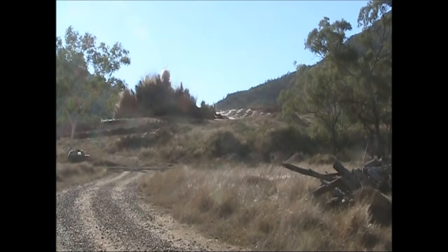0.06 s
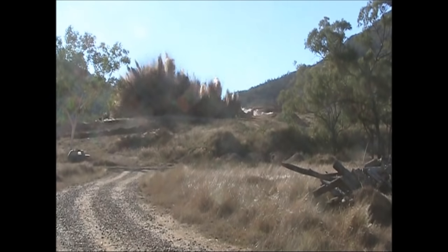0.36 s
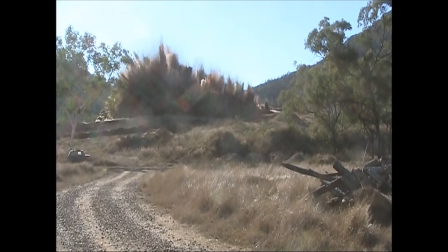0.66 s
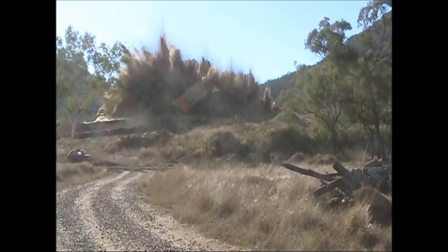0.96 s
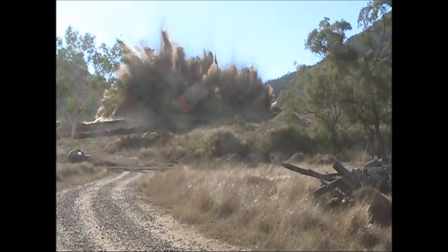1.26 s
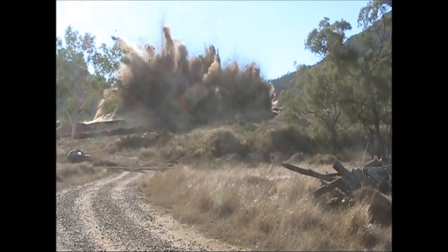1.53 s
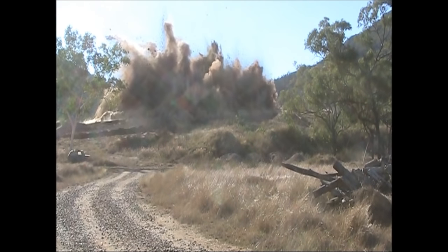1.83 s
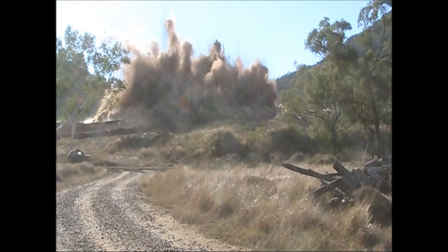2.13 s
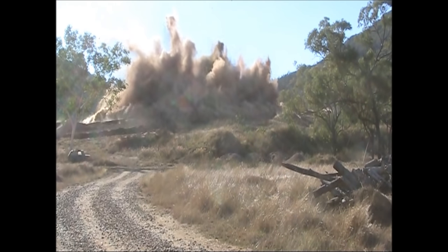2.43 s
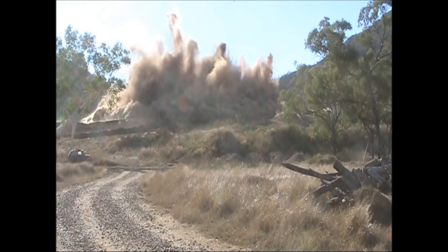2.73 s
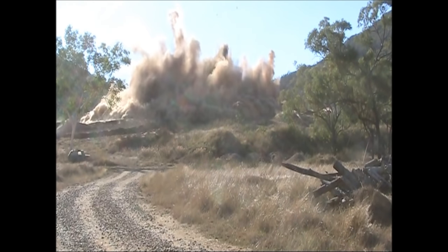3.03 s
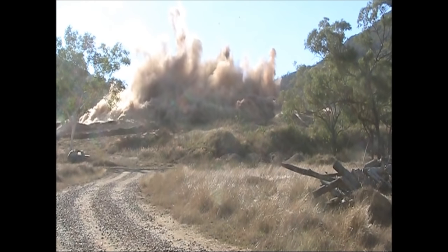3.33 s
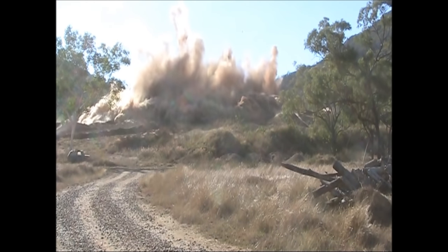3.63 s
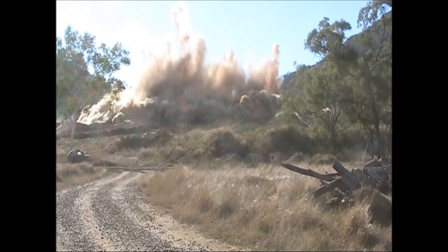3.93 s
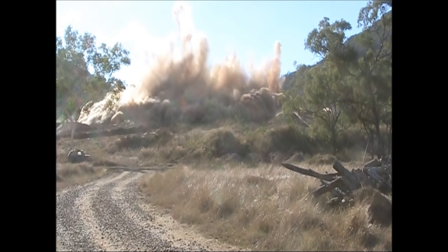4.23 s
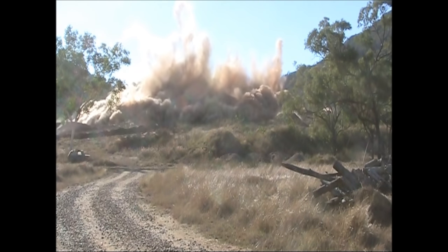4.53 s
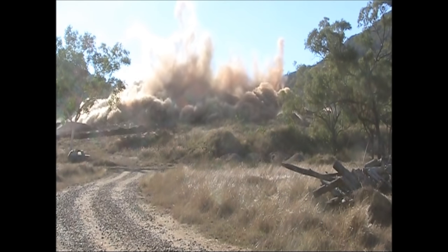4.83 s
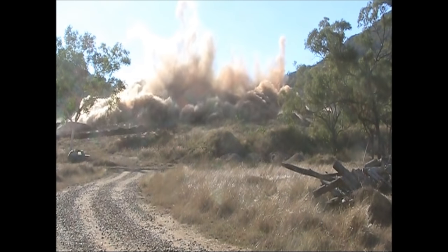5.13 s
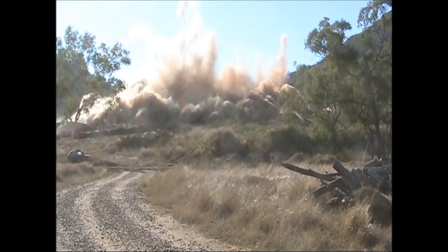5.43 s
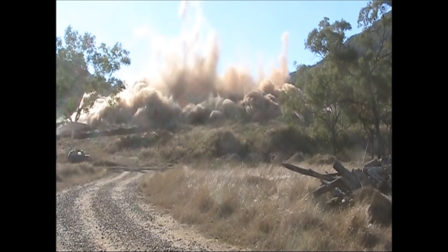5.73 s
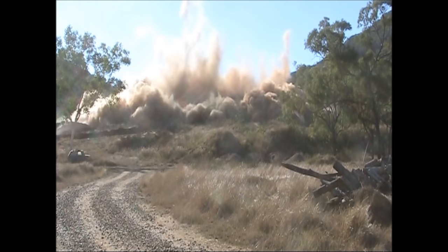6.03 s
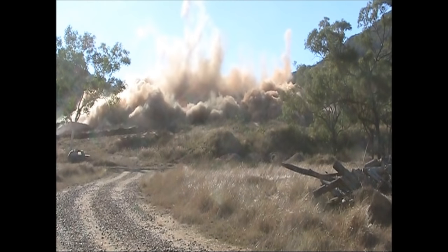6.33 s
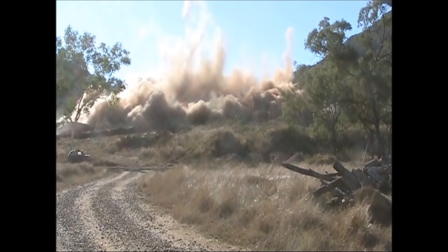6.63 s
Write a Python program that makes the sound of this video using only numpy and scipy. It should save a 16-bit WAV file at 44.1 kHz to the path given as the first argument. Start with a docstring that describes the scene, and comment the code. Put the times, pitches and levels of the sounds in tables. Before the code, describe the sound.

Detonators crackle along a distant quarry face as a ragged train of deep, heavy booms overloads the microphone. Dull thuds echo off the hills. Flung grit then rains down in a rushing roar, boulders tumble and loose rubble slides. Single stones and small chips clack ever more faintly as everything settles, heard outdoors in stereo over a faint low rumble and hiss.

```python
"""A quarry blast, taken outdoors from afar on a faintly hissing stereo microphone.
Detonators crackle away along the rock face, and the charges fire in a ragged train of deep air shocks
that overload the microphone. One tiny tick sounds close by. The boom rolls off the hills in dull thuds
while flung grit rains back in a rushing roar. Boulders tumble, the loose pile slides,
and single stones and chips clack on the quarry floor as it all settles over a faint low rumble."""
import sys
import numpy as np
from scipy import signal
from scipy.fft import rfft, irfft, next_fast_len
from scipy.io import wavfile
from scipy.ndimage import map_coordinates

SR = 44100
rng = np.random.default_rng(int(sys.argv[2]) if len(sys.argv) > 2 else 0)


def persist_wave(psi):
    """Save psi, clipped to +-1, as 16-bit WAV."""
    counts = np.round(np.clip(psi, -1, 1) * 32767).astype(np.int16)
    wavfile.write(sys.argv[1], SR, np.atleast_2d(counts).T)


N = 302967

# Single events; levels are relative within each table.
CRACKS = [(.001, -4), (.0222, -3.5), (.0436, -5.5), (.0645, -4.5), (.0703, -6.5), (.087, -1), (.1053, -9),
          (.1112, -10), (.1184, -6), (.1292, -10.5), (.1533, -3.5), (.179, -11), (.199, -9), (.2423, -14.5),
          (.2645, -7), (.2884, -16), (.3088, -15.5), (.3277, -8), (.337, -9), (.3507, -14.5), (.378, -13.5),
          (.3894, -11), (.4113, -13.5), (.4315, -12.5), (.4372, -12), (.4466, -13), (.475, -13),
          (.5048, -13), (.5345, -11.5), (.543, -14), (.5647, -14.5), (.5803, -11), (.593, -14.5),
          (.6168, -11.5), (.6268, -10.5), (.6378, -14.5), (.6507, -17), (.6585, -8), (.6834, -9),
          (.701, -14.5), (.7273, -11.5), (.7524, -12.5), (.766, -15), (.7933, -18), (.8203, -17),
          (.8322, -16.5), (.871, -18), (.9268, -18.5), (.957, -22), (.977, -22), (.9932, -19.5)]  # sharpest detonators: t/s, level/dB
CHARGES = [(.11, -4, 6.5), (.121, -8.5, 4.3), (.135, 3, 5.1), (0.164, -10, 6.9), (.172, 0.5, 5.8),
           (.182, 4.5, 5), (.204, -6, 5.2), (0.229, -1, 4), (0.256, -10, 6.9), (.267, -10.5, 2.8),
           (.274, -9, 7.1), (0.304, -10, 11), (.331, -7.5, 4.2), (.341, -11.5, 5), (.351, -7, 7.4),
           (.411, -10.5, 5.4), (.458, -3, 6.4), (.477, -6.5, 9.3), (0.509, -9.5, 4.6), (.568, -8.5, 3.8),
           (0.592, -6.5, 6.7), (.62, -12, 8.5), (0.644, -15.5, 5.5), (.727, -13, 11), (.745, -11, 6),
           (0.752, -16, 10), (0.811, -8, 9.3), (0.837, -7, 8), (0.876, -10.5, 7), (.939, -13, 3.5),
           (.947, -3, 5.7), (0.963, -7.5, 3.3), (1.003, -4, 6.8), (1.023, -13.5, 12), (1.038, -6.5, 7.9),
           (1.069, -11, 7.3), (1.095, -10.5, 7.4), (1.134, -9.5, 3.1), (1.176, -13.5, 9), (1.192, -3, 11.2),
           (1.251, -14, 14), (1.35, -16, 4.8)]  # air shocks of the heaviest charges: t/s, level/dB, push length/ms
TICK = (.7485, -29, 6000)  # tick beside the microphone: t/s, level/dB, f/Hz
ECHOES = [(1.438, -26.5, 79.4), (1.543, -28.5, 70), (1.632, -26, 65.4), (1.697, -31, 65),
          (1.871, -26.5, 80), (1.961, -26.5, 94), (2.108, -32, 90)]  # thuds off the far slopes: t/s, level/dB, f/Hz
ROCKS = [(1.624, -25.5, 1410, 1), (2.889, -32, 129, .5), (2.947, -26, 630, .7), (3.142, -29.5, 212, 0.37),
         (3.289, -26, 238, 0.52), (3.499, -33, 120, 0.46), (3.531, -30.5, 86, 0.54),
         (3.613, -32, 398, 0.46), (3.626, -34, 2300, 1.2), (3.66, -36, 198, .5), (3.667, -31, 1200, 0.87),
         (3.706, -33, 1080, 0.89), (3.749, -33, 900, 0.74), (3.816, -29, 373, .6), (4.013, -32, 1290, 0.89),
         (4.093, -28, 1250, 0.82), (4.2277, -36, 2080, 1.4), (4.2727, -40, 2200, 1.4),
         (4.288, -32.5, 1140, 0.84), (4.31, -40, 2800, 1.5), (4.4555, -34, 3600, 2.5),
         (4.458, -32.5, 152, .5), (4.597, -34, 905, .8), (4.861, -36.5, 2200, 1.5), (4.93, -36, 1900, .8),
         (5.065, -32.5, 1600, .7), (5.105, -34.5, 560, 0.42), (5.177, -39, 3400, 1.9),
         (5.2312, -26, 1270, 1.3), (5.3176, -38, 3000, 2.7), (5.362, -35.5, 162, .5),
         (5.378, -43.5, 169, 0.41), (5.501, -39, 160, .5), (5.57, -40, 123, 0.56), (5.605, -41, 150, .5),
         (5.626, -40, 2370, 1.6), (5.724, -37, 2900, 0.8), (5.729, -42, 274, 0.46),
         (5.757, -37.5, 1130, .9), (5.7863, -44, 2300, 1.5), (5.792, -40, 140, 0.59),
         (5.887, -46, 2400, 1.5), (6.016, -41, 405, .6), (6.017, -47, 2780, 1.9), (6.092, -43, 3520, 2.3),
         (6.251, -38.5, 2830, 3.7), (6.3364, -43.5, 2400, 1.7), (6.493, -46, 2600, 1.7),
         (6.674, -42, 145, 0.54), (6.713, -44.5, 1940, 1.4), (6.7485, -49, 2500, 1.6),
         (6.812, -40, 1020, .7)]  # loudest rocks landing, big ones low: t/s, level/dB, f/Hz, ring/cycles
CHIPS = (3.8, -45, 3.8, 2950)  # skittering chips: first t/s, first level/dB, fade/(dB/s), typical f/Hz

# Swells: rise until t/s, fade from t/s, relative level/dB, rise/(dB/s), fade/(dB/s)
NEAR_STRING = (0, 0.18, -22.5, 100, 60.5)  # detonators at the near end of the face
FAR_STRING = (0.56, 0.6746, -26.5, 11, 23)  # and at the far end
HEAVE = (.16, .18, -13, 150, 23)  # the first charges lift the face
GROUND_SURGE = (.88, 1.15, -21, 40, 28)  # the ground surges under the last rows of charges
ROLL_RETURN = (1.9, 1.98, -43, 70, 75)  # a faint roll between the echoes
LOW_FLOOR = (-1.5, 3, -59, 25, -0.3)  # a faint, steady low outdoor rumble
RUBBLE_BURST = (1.7, 1.43, -39.5, 7.5, 20)  # rubble bursts from the face
GRIT_RUSH = (2, 3, -41, 7.5, 19)  # the bulk of the grit comes down
GRIT_TRICKLE = (0.2, 3.5, -48, 17, 4)  # the highest flung keeps falling
BOULDER_FALL = (2.5, 3, -38.5, 20.5, 5)  # the heaviest blocks come down
RUBBLE_FALL = (2.5, 4, -45, 2.5, 3.5)  # rubble lands on the quarry floor
SLUMP = (3.54, 3.68, -43.5, 90, 45)  # the boulder pile gives way
SLIDE = (3.6, 3.82, -45.5, 14, 55)  # the loose pile slides

# Spectra at the microphone position: f/Hz, relative level/dB
HISS = [(30, 6), (500, -17), (3000, 6.5), (5000, 15), (7000, 12), (9000, 8.5), (12000, 4.5), (14400, -1.5),
        (15400, -12.5)]  # noise floor
NEAR_CRACKLE = [(30, -21.5), (100, -4), (200, -1.5), (450, 3), (800, 0), (1400, -0.5), (2000, -3.5),
                (3000, -12.5), (4200, -24.5), (5000, -35), (7000, -46.5), (10000, -67.5), (15000, -79)]  # near detonators
FAR_CRACKLE = [(100, -16.5), (300, -6.5), (600, -4), (900, 0), (1450, 0), (2000, -6.5), (3000, -16),
               (4200, -27.5), (5000, -42.5), (7000, -54), (10000, -74), (15000, -76)]  # far detonators
GROUND = [(12, -40.5), (25, -9.5), (42, -1), (85, -3), (125, -2.5), (200, -15), (350, -19), (600, -29),
          (1500, -65.5), (4000, -120)]  # heaving rock face
ROLL = [(12, -43), (25, -13.5), (45, 4), (70, -2.5), (110, -9), (170, -15), (300, -27.5), (1000, -78)]  # dark roll and low outdoor rumble
GRIT = [(300, -35), (800, -6), (1400, 1), (2000, -2), (2800, -6.5), (3500, -12), (4300, -17), (5000, -33.5),
        (6300, -34), (8000, -57.5), (15000, -73.5)]  # raining grit
RUBBLE = [(80, -29.5), (170, -0.5), (280, 3.5), (430, 2), (700, 1), (1100, -2.5), (1600, -30.5),
          (2500, -21), (5000, -34), (10000, -120)]  # falling rubble
BOULDERS = [(12, -34), (30, -4), (60, -3.5), (105, 0), (180, -4.5), (280, -13), (500, -15), (1000, -37),
            (3000, -120)]  # big blocks
COBBLES = [(12, -41), (30, -10), (60, -6), (110, -0.5), (170, 0), (280, -8.5), (500, -12.5), (1000, -44.5),
           (3000, -120)]  # smaller blocks
SCREE = [(120, -35.5), (300, -7), (410, 0.5), (560, -6), (750, -11.5), (1300, -34.5), (4000, -90)]  # sliding stones

LIKENESS = [(30, .995), (120, .995), (280, .96), (1000, .985), (2000, .975), (4000, .93), (8000, .8)]  # likeness of the two channels at width 1: f/Hz, correlation
BALANCE = [(60, -2.5), (150, -2), (400, -2), (1000, -3), (2000, -0.5), (4000, -1.5)]  # left minus right at lean 1: f/Hz, level/dB
HILL_DECAY = [(60, 1.3), (400, 0.39), (2000, 0.12), (8000, 0.28)]  # reverberation of the slopes: f/Hz, t60/s


def amp(db):
    """Decibels to gain."""
    return 10 ** (np.asarray(db) / 20)


def unit(x):
    """x at rms 1."""
    return x / np.sqrt(np.mean(x ** 2) + 1e-20)


def along(points, hz):
    """A table of f/Hz, value read on a log frequency axis."""
    f, v = np.transpose(points)
    return np.interp(np.log(hz + 1), np.log(f + 1), v)


def clock():
    """t/s of every sample."""
    return np.arange(N) / SR


def ramp(start, end):
    """0 before start, 1 after end."""
    return np.clip((clock() - start) / max(end - start, 1e-3), 0, 1)


def wobble(rate):
    """A smooth random curve, rate knots a second."""
    return map_coordinates(rng.standard_normal(int(N * rate / SR) + 4), [clock() * rate])


def swells(*rows):
    """Gain of one or more swells, whose powers add."""
    t, power = clock(), 0
    for from_s, until_s, db, rise, fade in rows:
        power += amp(db - rise * np.maximum(from_s - t, 0) - fade * np.maximum(t - until_s, 0)) ** 2
    return np.sqrt(power)


def blend(share, first, second):
    """Cross-fade two unrelated sounds at constant power."""
    return np.sqrt(1 - share) * first + np.sqrt(share) * second


def add(track, s, sound):
    """Mix a sound into the track at s seconds."""
    i = max(round(s * SR), 0)
    track[i:i + len(sound)] += sound[:N - i]


def filtered(x, response):
    """x times a response of frequency."""
    size = next_fast_len(N + SR // 2)
    return irfft(rfft(x, size) * response(np.fft.rfftfreq(size, 1 / SR)), size)[..., :N]


def lowpass(x, edge_hz, order):
    """x dulled above edge_hz."""
    return filtered(x, lambda hz: 1 / np.sqrt(1 + (hz / edge_hz) ** (2 * order)))


def impulse(spectrum, size=4096):
    """The sharpest causal pulse with this spectrum, peak 1."""
    cepstrum = irfft(np.log(amp(along(spectrum, np.fft.rfftfreq(size, 1 / SR)))))
    cepstrum[1:size // 2] *= 2
    cepstrum[size // 2 + 1:] = 0
    pulse = irfft(np.exp(rfft(cepstrum)))
    return pulse / np.abs(pulse).max()


def shower(spectrum, rate, spread_db, wash, width=1):
    """Stereo hail of rate uneven blows a second over a wash of countless tiny ones; rms 1."""
    sizes = amp(spread_db * np.clip(rng.standard_normal(N), -2, 2)) * rng.choice([-1, 1], N)
    blows = unit(sizes * (rng.random(N) < rate / SR))
    hail = unit(blows + wash * rng.standard_normal(N))
    diffuse = rng.standard_normal(N)
    pair = signal.fftconvolve([hail, diffuse], impulse(spectrum)[None], axes=1)[:, :N]
    angle = lambda hz: np.minimum(width * np.arccos(along(LIKENESS, hz)) / 2, np.pi / 4)
    mid, side = filtered(pair, lambda hz: np.array([np.cos(angle(hz)), np.sin(angle(hz))]))
    return unit(np.array([mid + side, mid - side]))


def knock(pitch_hz, cycles, grind):
    """A dead blow: a few cycles and a short crush of noise around them, peak 1."""
    phase = np.arange(SR // 8) / SR * pitch_hz
    band = signal.butter(2, [pitch_hz * .6, min(pitch_hz * 1.35, SR / 2 - 1)], "band", fs=SR)
    crush = unit(signal.lfilter(*band, rng.standard_normal(len(phase))))
    ring = np.sin(2 * np.pi * phase) * np.exp(-phase / cycles)
    attack = 1 - np.exp(-(phase / .5) ** 2)
    blow = attack * (ring + grind * crush * np.exp(-phase / (2.5 * cycles)))
    return blow / np.abs(blow).max()


def hills(x):
    """Stereo scatter from the slopes and trees around, the bass lasting longest."""
    hz, t, noise = signal.stft(rng.standard_normal((2, SR)), SR, nperseg=256)
    tail = signal.istft(noise * amp(-60 * t / along(HILL_DECAY, hz)[:, None]), SR, nperseg=256)[1]
    return signal.fftconvolve(x[None], tail / np.linalg.norm(tail[0]), axes=1)[:, :N]


def placed(x, lead_ms, lean):
    """x reaches the left capsule a little early and the right one louder."""
    early = lambda hz: np.exp(1j * np.pi * np.outer([1, -1], hz) * lead_ms / 1000)
    return filtered(x, lambda hz: early(hz) * amp(np.outer([.5, -.5], lean * along(BALANCE, hz))))


def hiss(level_db=-69):
    """Faint steady hiss, unrelated in the two channels."""
    return amp(level_db) * unit(filtered(rng.standard_normal((2, N)), lambda hz: amp(along(HISS, hz))))


def volley(crackle_db=-3, crack_db=3, echo_db=-12, scatter=0.058):
    """Detonators snap in a dense string that runs away from the microphone and loses its body."""
    far = ramp(0.14, 0.63)
    crackle = blend(far, shower(NEAR_CRACKLE, rate=650, spread_db=3.5, wash=0.69),
                    shower(FAR_CRACKLE, rate=450, spread_db=1.0, wash=0.98, width=1.7))
    crackle *= amp(crackle_db) * swells(NEAR_STRING, FAR_STRING)
    snaps, t = np.zeros(N), np.arange(SR // 100) / SR
    for s, db in CRACKS:
        # rough ground breaks up each snap
        broken = scatter * rng.standard_normal(len(t)) * amp(-60 * t / 0.028)
        add(snaps, s, amp(db + crack_db) * ((t == 0) * 0.5 + broken))
    cracks = signal.fftconvolve(snaps * (1 - far), impulse(NEAR_CRACKLE))[:N]
    cracks += signal.fftconvolve(snaps * far, impulse(FAR_CRACKLE))[:N]
    return crackle + cracks + amp(echo_db) * hills(cracks)


def charges(suck=0.52, suck_ms=0.89, damping=1.33, trim_db=1.7, echo_db=-23):
    """Each air shock arrives as a dip, a steep front, a push and a weak rebound."""
    track = np.zeros(N)
    ms = np.arange(-SR // 20, SR // 20) * 1000 / SR
    before, after = np.maximum(-ms, 0) / suck_ms, np.maximum(ms, 0)
    dip = suck * before * np.exp(1 - before)
    for s, db, push_ms in CHARGES:
        push = np.sin(np.pi * after / push_ms) * np.exp(-damping * after / push_ms)
        add(track, s - 1 / 20, amp(db + trim_db) * (push / push.max() - dip))
    track = lowpass(track, edge_hz=750, order=2)  # distance rounds the fronts
    return track + amp(echo_db) * hills(track)


def rumble():
    """The heaving face rumbles beneath the shocks and rolls away darker, over a steady low floor."""
    ground = blend(ramp(0.93, 1.45), shower(GROUND, rate=200, spread_db=2.0, wash=0.75),
                   shower(ROLL, rate=480, spread_db=7.5, wash=0.76))
    return ramp(.11, .13) * swells(HEAVE, GROUND_SURGE, ROLL_RETURN, LOW_FLOOR) * ground


def rockfall(grit_db=1.5, surge_db=0.34, lurch_db=0.5):
    """Grit rushes down first; boulders and rubble follow, growing smaller, sparser and more scattered."""
    def thinning(spectrum):
        return blend(ramp(3.67, 6.87), shower(spectrum, rate=2500, spread_db=2.0, wash=0.9, width=1.54),
                     shower(spectrum, rate=300, spread_db=3.0, wash=1.0, width=7.4))

    surge = surge_db * wobble(9)
    tumble = blend(ramp(3.34, 3.88), shower(BOULDERS, rate=140, spread_db=0.0, wash=0.93, width=1.5),
                   shower(COBBLES, rate=140, spread_db=-0.5, wash=0.81, width=2.4))
    boulders = swells(BOULDER_FALL, SLUMP) * amp(surge + lurch_db * wobble(4.5)) * tumble
    rubble = swells(RUBBLE_BURST, RUBBLE_FALL) * amp(surge) * thinning(RUBBLE)
    grit = swells(GRIT_RUSH, GRIT_TRICKLE) * amp(grit_db + .5 * surge) * thinning(GRIT)
    return boulders + ramp(0.43, 1.41) * (rubble + grit)


def tick(again_s=0.0014, again_db=-4):
    """A tiny dry double tick close to the microphone."""
    track = np.zeros(N)
    s, db, pitch_hz = TICK
    for delay, drop_db in ((0, 0), (again_s, again_db)):
        add(track, s + delay, amp(db + drop_db) * knock(pitch_hz, cycles=1.5, grind=0.37))
    return lowpass(track, edge_hz=7500, order=5)


def echoes():
    """Far slopes return the shocks, rounded into dull thuds."""
    track = np.zeros(N)
    for s, db, pitch_hz in ECHOES:
        add(track, s, amp(db) * knock(pitch_hz, cycles=.7, grind=0.24))
    return track


def rocks(trim_db=1.5, echo_db=-13):
    """Single stones strike the distant quarry floor; small ones ring for more cycles."""
    track = np.zeros(N)
    for s, db, pitch_hz, cycles in ROCKS + stone_chips():
        add(track, s, amp(db + trim_db) * knock(pitch_hz, cycles, grind=0.27))
    track = lowpass(track, edge_hz=4000, order=5)  # the air between takes the treble
    return track + amp(echo_db) * hills(track)


def slide():
    """Fist-sized rubble slides off the slumping pile in one continuous tumble."""
    return swells(SLIDE) * shower(SCREE, rate=160, spread_db=2.5, wash=.6, width=1.5)


def stone_chips(count=150, spread_db=1.0, pitch_spread=0.24, cycles=1.2):
    """Small chips land at random among the rocks, ever more faintly; rows like ROCKS."""
    from_s, first_db, fade_db_per_s, typical_hz = CHIPS
    size, pitch, late = np.clip(rng.standard_normal((count, 3)).T, -2, 2)
    after_s = (N / SR - from_s) * np.clip(np.arange(count) + .5 + late, 0, count - .5) / count
    level_db = first_db - fade_db_per_s * after_s + spread_db * size
    pitch_hz = np.minimum(typical_hz * np.exp(pitch_spread * pitch), SR / 10)
    return list(zip(from_s + after_s, level_db, pitch_hz, np.full(count, cycles)))


def scene():
    """From the microphone the blast leans right; from 5.7 s the last debris sits nearer the middle."""
    debris = rockfall() + slide() + rocks()
    blast = charges() + echoes() + rumble() + volley()
    settling = ramp(5.7, 5.701)
    right = placed(blast + (1 - settling) * debris, lead_ms=0.017, lean=0.99)
    middle = placed(settling * debris, lead_ms=0.02, lean=0.14)
    return right + middle + tick() + hiss()


def record(dry, ceiling=0.9, hardness=40, low_cut_hz=23, leak_hz=52, splutter_db=-53, top_hz=15400):
    """The microphone's left capsule leaks bass; the shocks flatten at the input ceiling and splutter."""
    capsules = lambda hz: np.array([1j * hz / (1j * hz + leak_hz), np.ones(len(hz))])
    low_cut = lambda hz: hz ** 3 / np.sqrt(hz ** 6 + low_cut_hz ** 6)
    heard = filtered(dry, lambda hz: capsules(hz) * low_cut(hz))
    clipped = heard / (1 + np.abs(heard / ceiling) ** hardness) ** (1 / hardness)
    splutter = amp(splutter_db) * (np.abs(heard) > ceiling) * rng.standard_normal(heard.shape)
    return filtered(clipped + splutter, lambda hz: hz < top_hz)


dry = scene()
out = record(dry)
persist_wave(out)
```